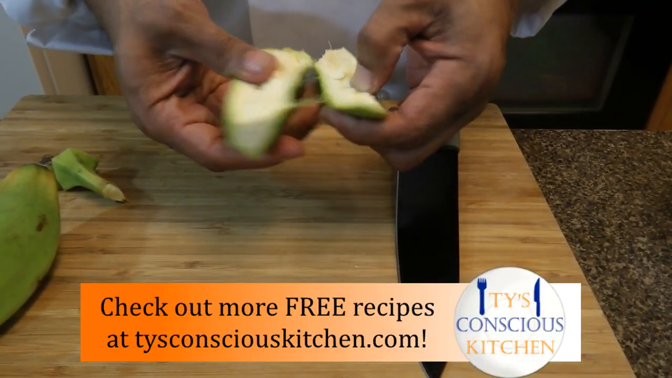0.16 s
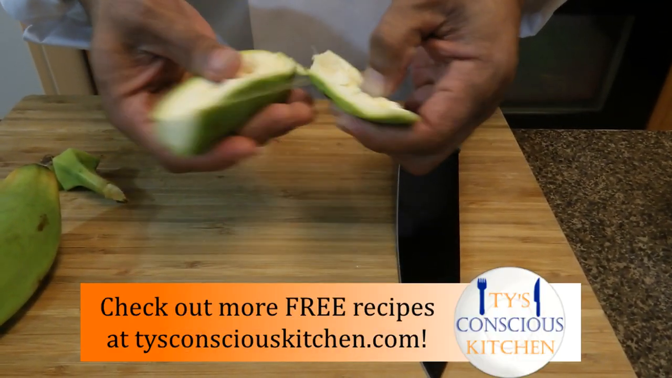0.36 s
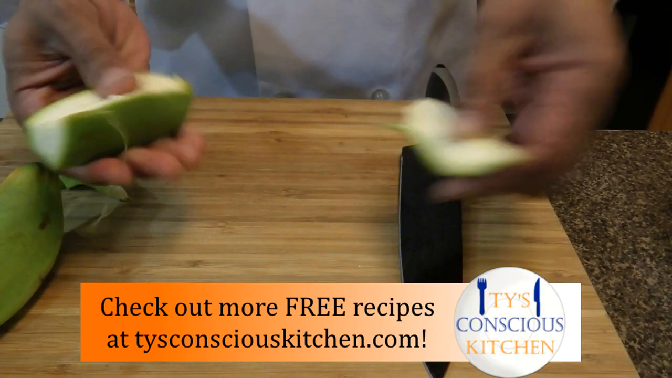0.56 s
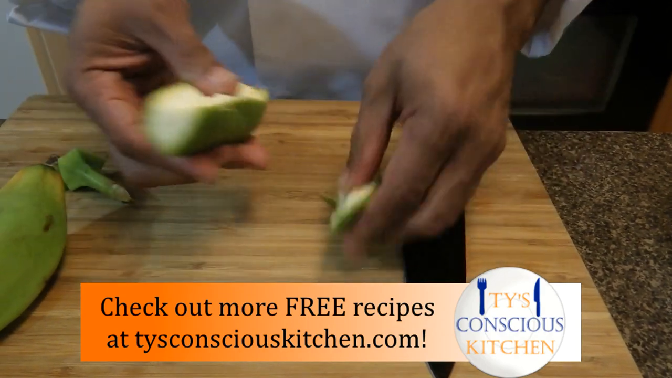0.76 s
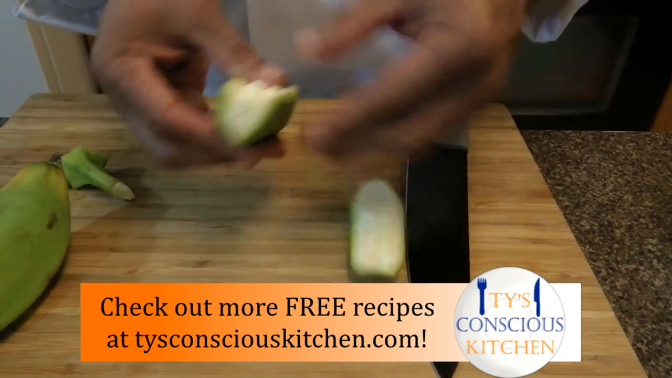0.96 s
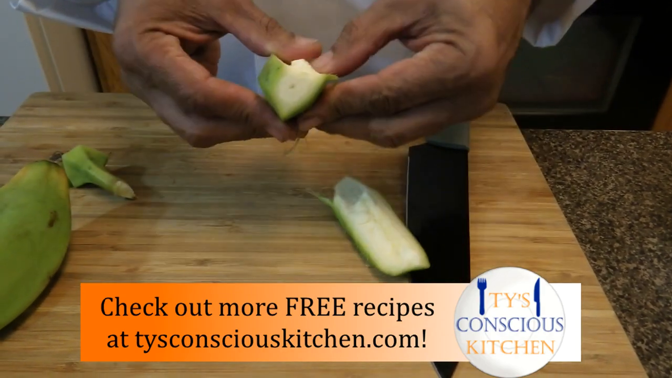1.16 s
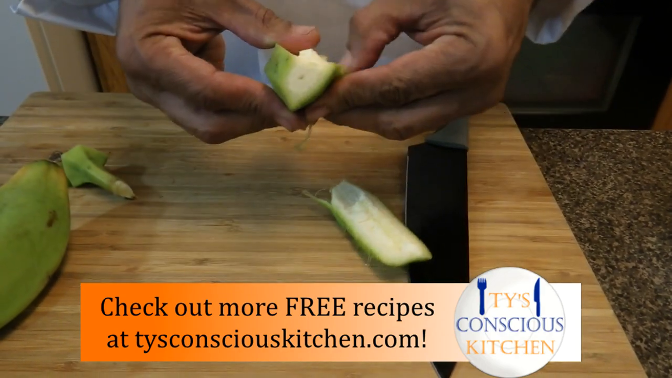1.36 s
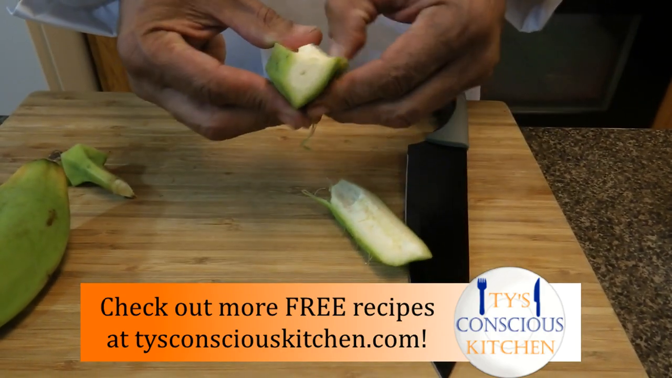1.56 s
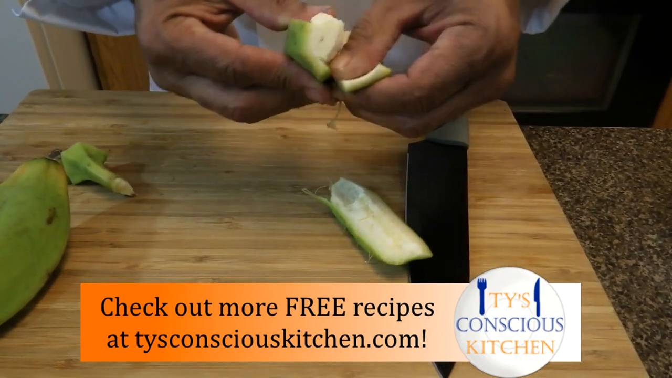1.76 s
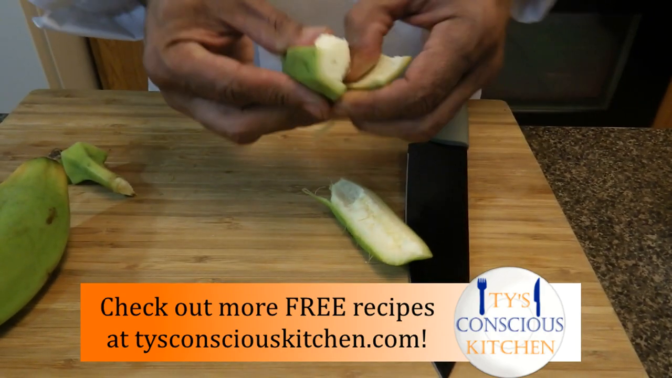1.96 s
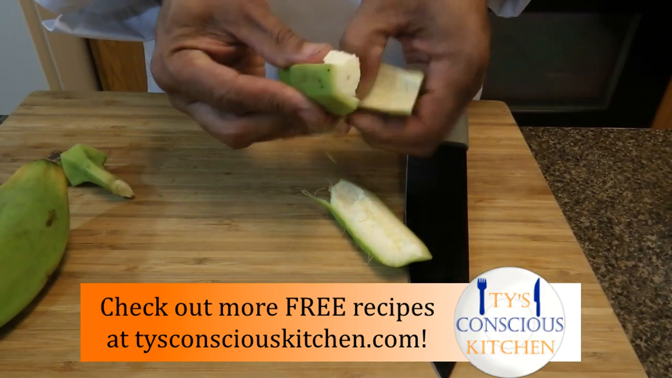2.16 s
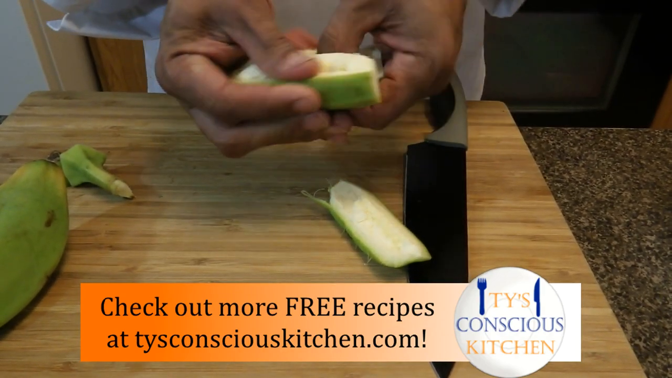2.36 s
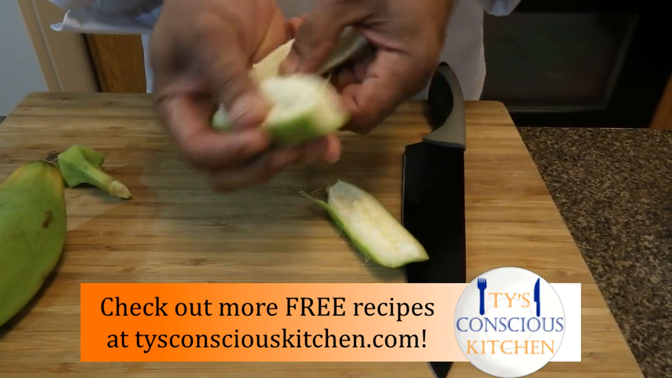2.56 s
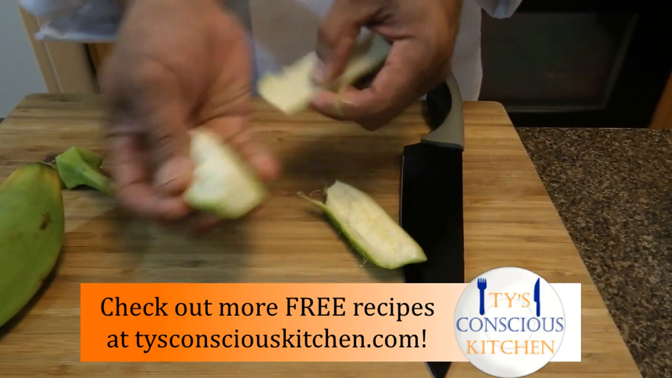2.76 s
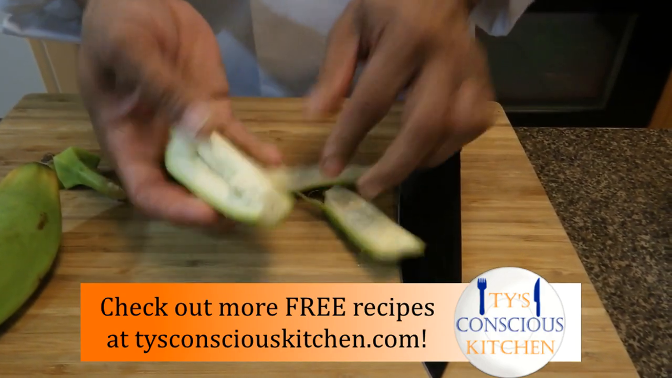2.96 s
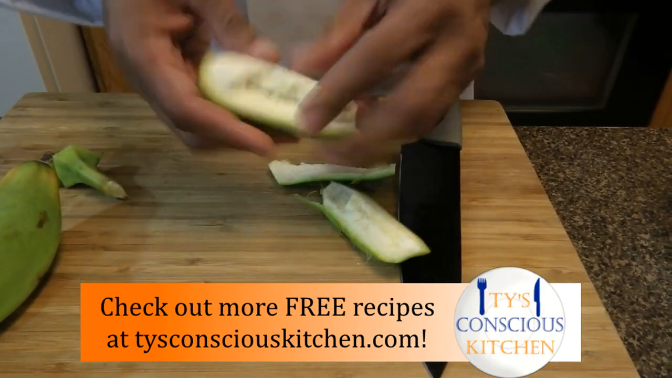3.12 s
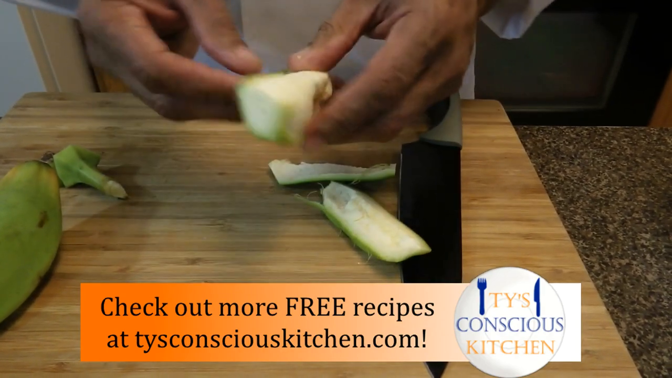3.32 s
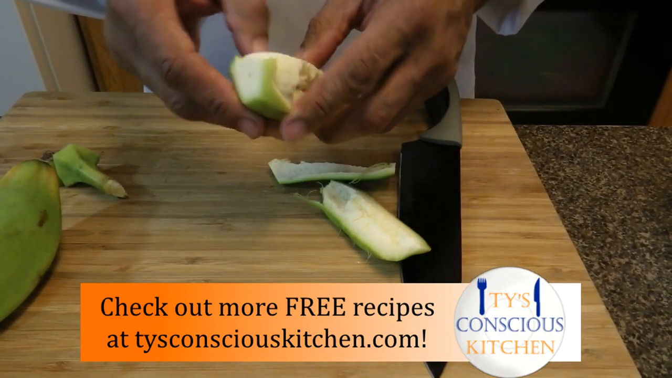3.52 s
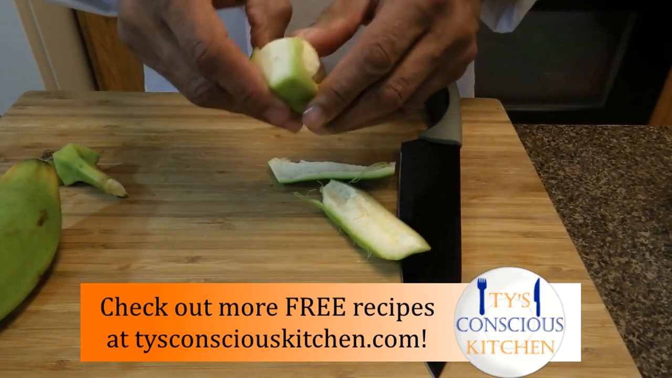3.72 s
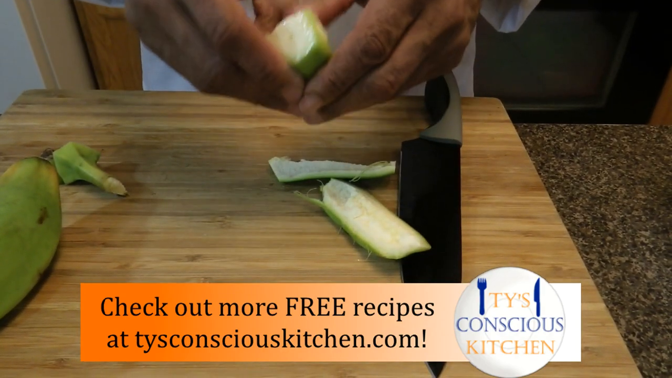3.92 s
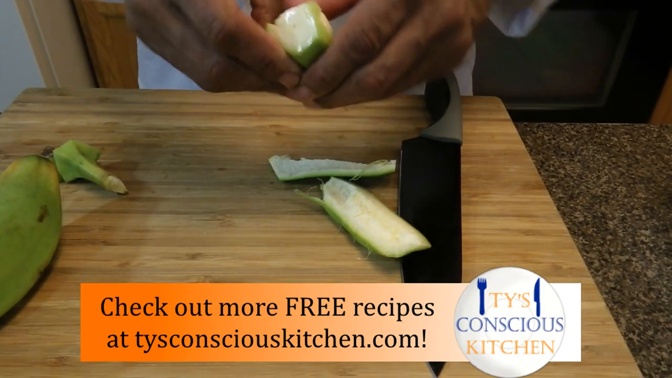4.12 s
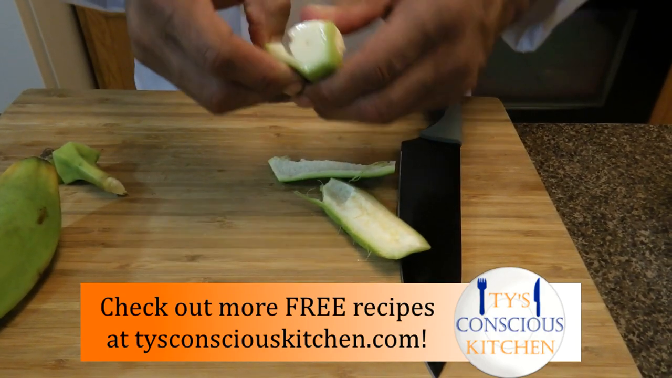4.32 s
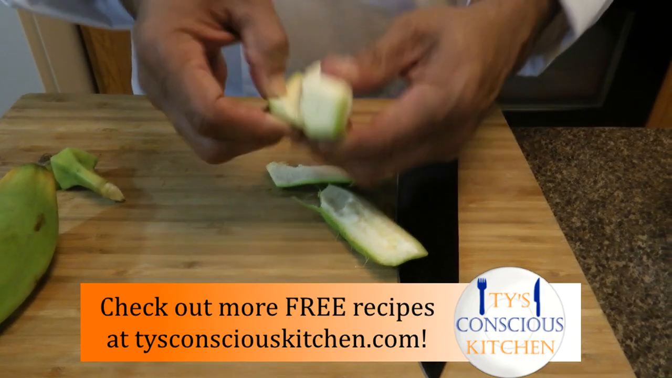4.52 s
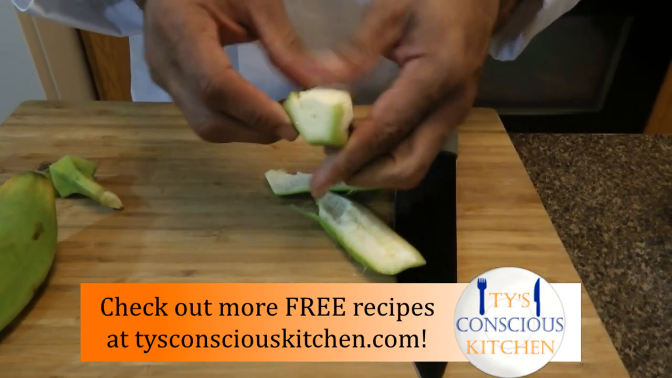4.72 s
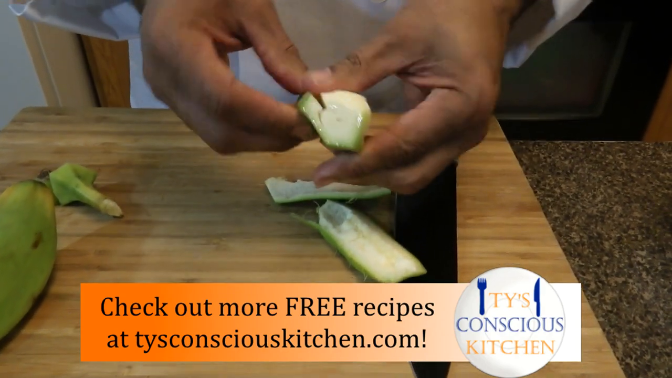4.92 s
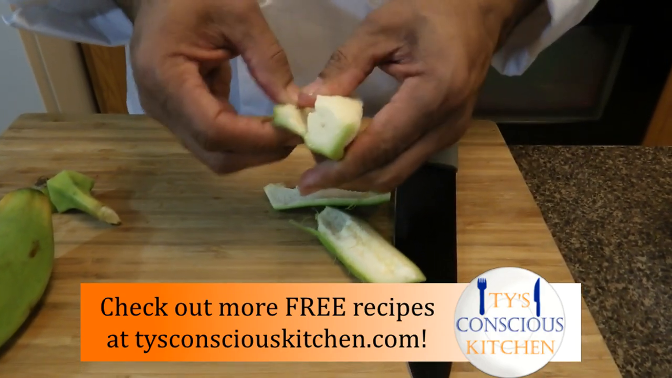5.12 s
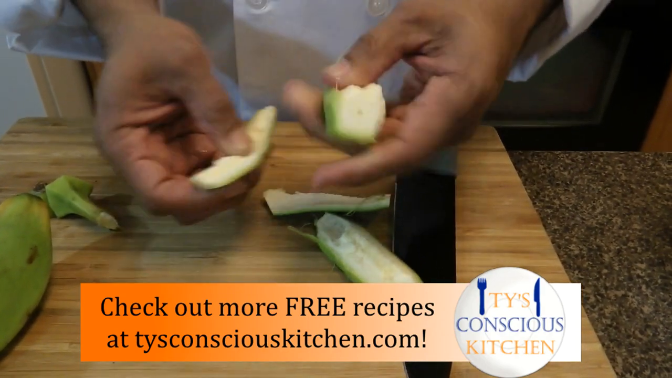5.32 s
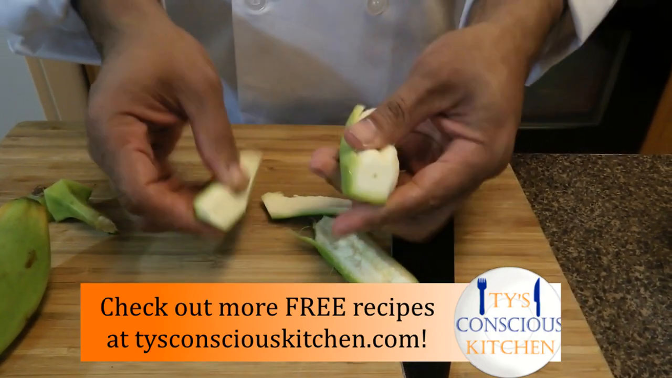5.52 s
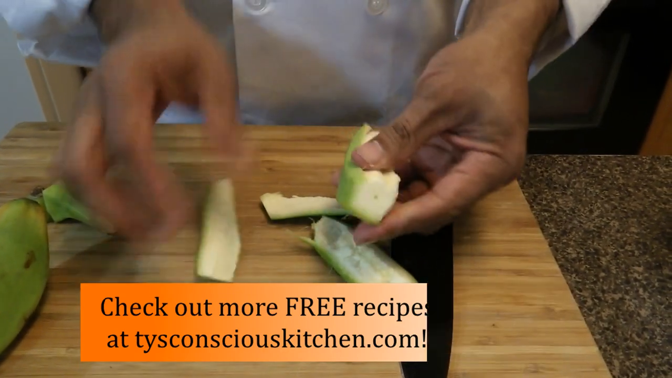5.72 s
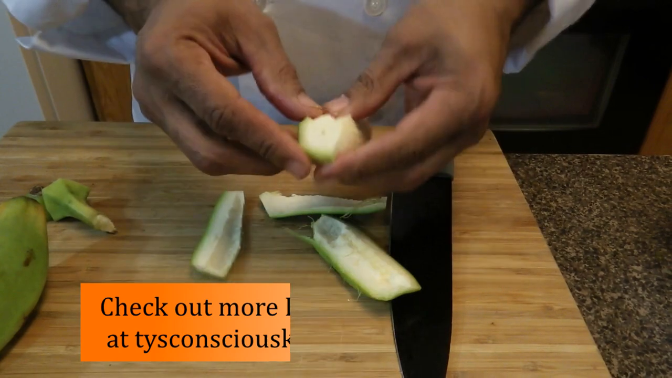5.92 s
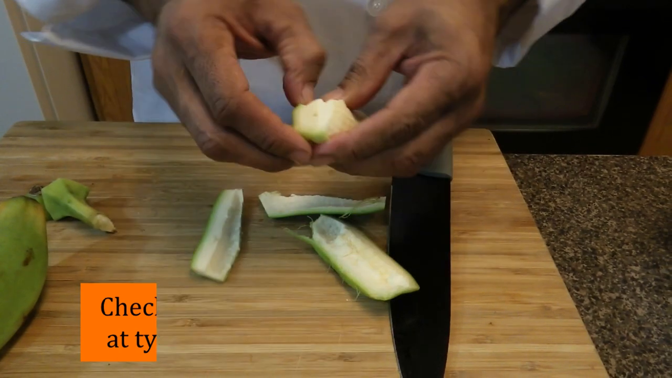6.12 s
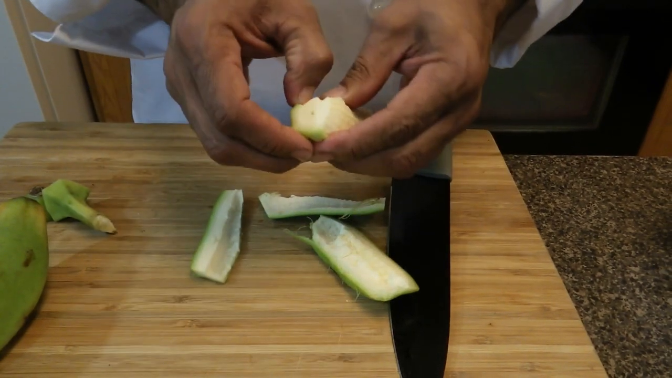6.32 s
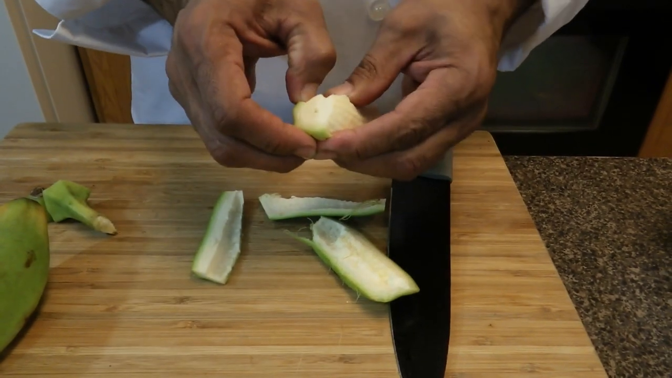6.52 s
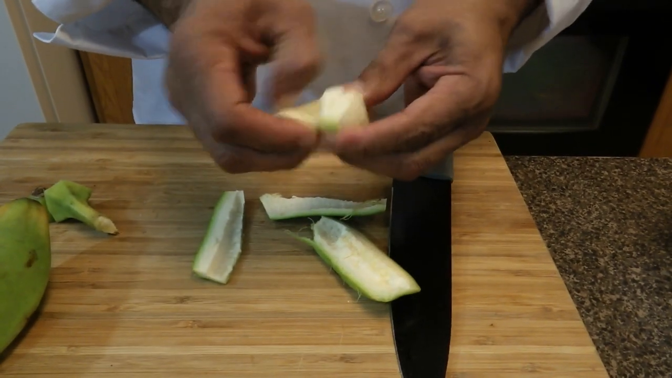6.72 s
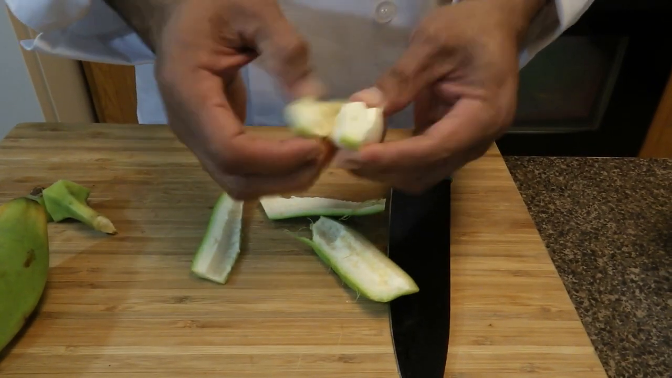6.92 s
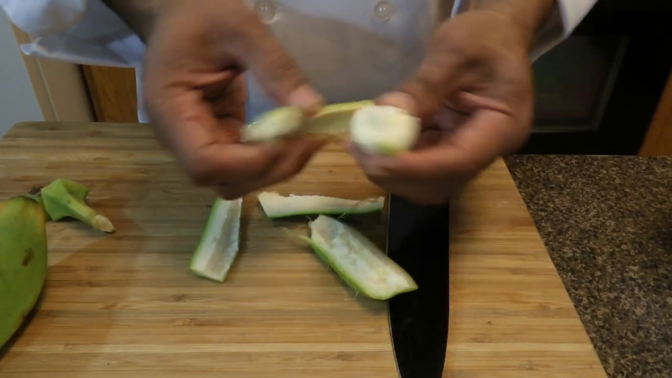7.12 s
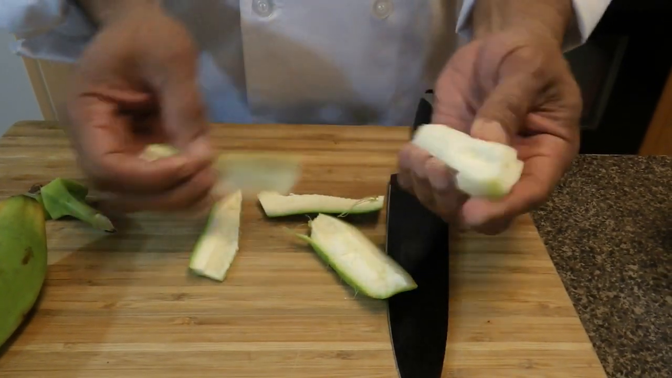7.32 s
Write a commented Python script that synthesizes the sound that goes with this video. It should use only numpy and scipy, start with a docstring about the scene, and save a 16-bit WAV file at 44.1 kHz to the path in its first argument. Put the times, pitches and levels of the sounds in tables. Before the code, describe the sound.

Hands strip a green banana with crackling rips and small snaps, setting peel on a wooden board in a softly humming kitchen.

```python
"""A green banana's thick peel tears off in short rips, by hand, over a wooden board in a kitchen.
Each rip is a run of breaking fibres that ring the strip; single stout fibres snap on their own.
Pieces of peel knock on the board, sleeves and fingers rustle, and an appliance hums behind it all.
Automatic gain control ducks the room after the loudest rips."""
import sys
import numpy as np
from scipy import signal
from scipy.fft import rfft, irfft, next_fast_len
from scipy.io import wavfile
from scipy.ndimage import uniform_filter1d

SR = 44100
rng = np.random.default_rng(int(sys.argv[2]) if len(sys.argv) > 2 else 0)


def generate_wav(signal):
    """Clip the signal to [-1, 1] and save it as 16-bit WAV at the path in sys.argv[1]."""
    frames = np.transpose(np.atleast_2d(signal))
    scaled = np.clip(frames, -1, 1) * 32767
    pcm = np.round(scaled).astype(np.int16)
    wavfile.write(sys.argv[1], SR, pcm)


N = 329684
TIME = np.arange(N) / SR


def peel_rips(fibres_per_s=3600, slips_per_s=150, slip_db=3, swell_db=4, fade_s=0.008, bends=5):
    """The tear front jerks forward and breaks fibres of all sizes; the strip's ring drifts as it bends."""
    # one rip a row: start/s, end/s, level/dB, growth over the rip/dB, strip ring/Hz, juicy top/dB
    rips = [(0.292, 0.304, -23.5, 2, 3000, -16), (0.32, 0.39, -33, -5, 2740, -0.5),
            (0.481, 0.533, -34.5, 4, 2900, 6.5), (0.531, 0.564, -28, -3, 2950, -1),
            (1.461, 1.533, -32, -6, 4400, 2), (1.756, 1.806, -23.5, 0.5, 6200, -4),
            (1.822, 1.878, -23.5, -0.5, 5700, -4.5), (2.041, 2.182, -35.5, -6.5, 3580, 0),
            (2.342, 2.492, -39, 2.5, 3700, 0), (2.585, 2.706, -27.5, 13, 5180, -1),
            (2.717, 2.778, -38.5, 9, 5900, 4), (2.806, 2.815, -21.5, -7, 3480, -5.5),
            (4.221, 4.35, -46.5, -8, 6440, -2), (4.372, 4.413, -27.5, 15, 6330, -1),
            (4.427, 4.469, -33, 6, 4700, 4), (4.501, 4.645, -35, 10.5, 3900, 3.5),
            (5.15, 5.326, -37.5, -18, 5350, 2.5), (5.314, 5.368, -20, -11.5, 3660, -1.5),
            (5.373, 5.382, -9.5, -10, 3550, 12), (5.377, 5.421, -30.5, 10.5, 3000, 2),
            (6.851, 6.88, -16, 3, 3830, 0.5), (6.878, 6.911, -20, 8, 6100, 11),
            (7.206, 7.374, -29, -3.5, 3480, 4.5)]
    out = np.zeros(N)
    slip = amp(slip_db * wander(slips_per_s))
    breaks = (rng.random(N) < fibres_per_s / SR) * rng.choice([-1, 1], N)
    stoutness = np.minimum(rng.exponential(1, N), 3.5)
    bend = np.clip(np.round((bends - 1) / 2 + wander(70)), 0, bends - 1)
    fizz = 0.32 * rng.standard_normal(N)  # tiny wet cells burst between the fibres
    for start, end, level_db, growth_db, strip_hz, top_db in rips:
        # a thick strip rings low and has more body; the fibres' higher ring follows it a little
        thickness = 3000 / strip_hz
        body_db = -3 + 11 * thickness ** 4.7
        fibre_hz = 6000 / thickness ** 0.29
        # a gentle pull picks off fibres one by one, a hard one tears them evenly
        spread_db = max(2.5 - 0.26 * (level_db + 27), 4)
        span = slice(round((start - .08) * SR), min(round((end + .08) * SR), N))
        t = TIME[span]
        progress = np.clip((t - start) / (end - start), 0, 1)
        fibres = breaks[span] * amp(spread_db * stoutness[span])
        drive = evened((fibres + fizz[span]) * slip[span])
        drive *= amp(swell_db * (np.sin(np.pi * progress) - 2 / np.pi))  # the pull swells midway
        rise_s = min(0.19 * (end - start), 0.0087)  # a slow pull takes longer to get going
        before, after = np.maximum(start - t, 0), np.maximum(t - end, 0)
        envelope = np.exp(-before / rise_s - after / fade_s)
        strain = amp(-20) * np.exp(-(before + after) / 0.018)  # a few fibres give on either side
        drive *= np.maximum(envelope, strain) * amp(level_db + growth_db * (progress - .5))
        for k, stretch in enumerate(1 + .07 * np.linspace(-1, 1, bends)):
            rings = [(strip_hz * stretch, 7.5), (fibre_hz * stretch, 7.8)]
            click = fibre_click(rings, width=0.044, body_db=body_db, top_db=top_db)
            crackle = signal.fftconvolve(drive * (bend[span] == k), click / np.linalg.norm(click))
            add(out, t[0], crackle)
            add(out, t[0] + rng.uniform(.0005, .0025), 0.21 * crackle)  # bounce off hands and board
    return out


def fibre_click(rings, width, body_db, top_db, size=1024):
    """One breaking fibre, coloured by the peel and by the strip's rings (f/Hz, boost/dB)."""
    # tone of the peel: f/Hz, level/dB
    peel_colour = [(100, -33), (500, -16), (1100, -12.5), (1800, -9.5), (2400, -7.5), (3200, -3.5),
                   (6800, -0.5), (9000, -1.5), (13000, -6.5), (15800, -15.5)]
    hz = abs(np.fft.fftfreq(size, 1 / SR))
    resonance = sum(db / (1 + ((hz / ring_hz - 1) / width) ** 2) for ring_hz, db in rings)
    body = body_db / (1 + (hz / 2700) ** 4)
    top = top_db * (1 - 1 / (1 + (hz / 9200) ** 8))
    gain = amp(curve_at(peel_colour, hz) + resonance + body + top)
    minimum_phase = np.exp(np.conj(signal.hilbert(np.log(gain))))  # keeps the attack sharp
    return np.fft.ifft(minimum_phase).real[:size // 2]


def fibre_snaps(lead_s=0.00098, splinter_s=0.0006, size=300):
    """A stout fibre starts to split, cracks and splinters; the finer it is, the higher and thinner."""
    # single fibres giving way: t/s, peak/dB, ring/Hz
    snaps = [(0.028, -15, 6760), (0.1104, -11.5, 4440), (0.211, -18, 6000), (0.215, -17, 6770),
             (.224, -14, 3600), (.255, -23, 4500), (0.2724, -19, 7600), (0.291, -6.5, 5900),
             (0.3006, -6, 3300), (0.5287, -9.5, 4970), (2.177, -26, 7500), (2.443, -18, 7000),
             (2.6796, -7, 6530), (2.707, -10, 7900), (2.999, -17, 5670), (4.3546, -19, 8000),
             (4.617, -14.5, 6950), (5.283, -15.5, 7000), (4.281, -24.5, 8400), (6.339, -28.5, 9000),
             (7.03, -25, 9600)]
    out, t = np.zeros(N), (np.arange(size) - size // 2) / SR
    for s, db, ring_hz in snaps:
        splinters = 0.64 * rng.standard_normal(size) * np.exp(np.minimum(t / lead_s, -t / splinter_s))
        click = fibre_click([(ring_hz, 10)], width=0.34, body_db=6.5, top_db=-4.5)
        crack = np.convolve((t == 0) + splinters, click)
        crack = signal.lfilter(*signal.butter(1, 0.1 * ring_hz, "high", fs=SR), crack)
        add(out, s + t[0], amp(db) * crack / abs(crack).max())
    return out


def board_knocks(split_hz=400, squash_s=0.0042, rumble_s=0.11, size=12000):
    """The weight of a piece drives the board's low modes, its damp edge slaps the high ones."""
    # peel and fingers meeting the board: t/s, dull thud/dB, sharp clack/dB
    knocks = [(0.803, -44, -32), (0.870, -27.5, -31), (1.030, -26, -25.5), (1.119, -22.5, -22.5),
              (1.210, -44, -32), (3.080, -47, -29.5), (3.115, -32, -23.5), (3.2, -42, -30),
              (5.868, -42, -14), (5.933, -47.5, -26.5)]
    # modes of the board with a knife lying on it: f/Hz, level/dB, t60/s
    board_modes = [(58.4, -15, 0.45), (142, -8.5, 0.072), (238, -4, 0.025), (465, -6.5, 0.075),
                   (776, 4.5, 0.023), (1336, -4.5, 0.019), (2090, -6, 0.0052), (2570, -10, 0.0055),
                   (3160, -6, 0.011)]
    out, t = np.zeros(N), np.arange(size) / SR
    hz, db, t60 = np.transpose(board_modes)[:, :, None]
    low_share = 1 / (1 + (hz / split_hz) ** 4)
    weight = (low_share * amp(db - 60 * t / t60) * np.sin(2 * np.pi * hz * t)).sum(0)
    counter_band = signal.butter(2, [60, 260], "band", fs=SR, output="sos")
    for s, thud_db, clack_db in knocks:
        # a dropped piece lands tip first and rings freely; one laid down is damped and settles after
        dropped = clack_db - thud_db > 20
        t60_scale, touch_s, touch_db = (1, -0.012, -8.5) if dropped else (0.86, 0.026, -10)
        decay = amp(db - 60 * t / (t60_scale * t60))
        ring = ((1 - low_share) * decay * np.cos(2 * np.pi * hz * t)).sum(0)
        squash = 0.43 * rng.standard_normal(size) * np.exp(-t / squash_s)
        slap = 4 * (squash + (t == 0))
        clack = signal.lfilter(*signal.butter(2, [380, 4000], "band", fs=SR), ring + slap)
        counter_rumble = evened(signal.sosfilt(counter_band, rng.standard_normal(size)))
        thud = weight / abs(weight).max() + 0.11 * counter_rumble * np.exp(-t / rumble_s)
        blow = amp(thud_db) * thud + amp(clack_db) * clack / abs(clack).max()
        add(out, s, blow)
        add(out, s + touch_s, amp(touch_db) * blow)
    # a small board radiates no deep bass
    return signal.sosfilt(signal.butter(4, 50, "high", fs=SR, output="sos"), out)


def hand_rustle(catches_per_s=180, catch_db=-9.5, spread_db=5, flutter_db=1, patchy_db=2):
    """Cloth and skin slide with a hiss of shifting colour; damp fingertips catch on the peel in ticks."""
    # tone of the rubbing: f/Hz, level/dB
    cloth_colour = [(100, -0.5), (750, -2), (1150, -1), (1750, 2), (4000, 0.5), (6700, 2.5), (8500, -1.5),
                    (15500, -18)]
    spectra = signal.stft(rng.standard_normal(N), nperseg=512)[2]
    patches = uniform_filter1d(rng.standard_normal(spectra.shape), size=6, axis=0)
    patches = evened(uniform_filter1d(patches, size=14, axis=1))
    hiss = signal.istft(spectra * amp(patchy_db * patches), nperseg=512)[1][:N]
    slide = shaped(hiss, cloth_colour) * amp(flutter_db * wander(25))
    catches = rng.random(N) < catches_per_s / SR
    ticks = catches * amp(spread_db * np.minimum(rng.exponential(1, N), 5))
    return hand_motion() * (slide + amp(catch_db) * shaped(ticks, cloth_colour))


def hand_motion(hold_db=-53.5, end_drop_db=6):
    """Envelope of the rustle: each stroke swells and dies away over the faint stir of holding."""
    # hands swinging apart or taking a new grip: fastest moment/s, length/s, level/dB
    strokes = [(0.356, 0.3, -45), (0.619, 0.12, -38.5), (0.927, 0.19, -43), (2.093, 0.26, -47.5),
               (2.56, 0.33, -43.5), (2.909, 0.17, -37.5), (3.172, 0.43, -42.5), (3.684, 0.19, -45),
               (3.79, 0.072, -45), (4.021, 0.13, -45), (4.802, 0.23, -43.5), (5, 0.13, -45.5),
               (5.42, 0.13, -44), (5.84, 0.3, -46.5), (6.006, 0.11, -37), (7.093, 0.21, -45),
               (7.444, 0.091, -35)]
    t = np.linspace(0, TIME[-1], 2000)
    swells = [amp(db - end_drop_db * abs(2 * (t - s) / length) ** 1.3) for s, length, db in strokes]
    power = amp(hold_db) ** 2 + sum(swell ** 2 for swell in swells)
    return np.interp(TIME, t, np.sqrt(power))


def kitchen(x, near_db=-14, near_s=0.0093, tail_db=-15, size=20000):
    """Adds early scatter from the counter and cupboards, and a short faint tail."""
    # decay of the room: f/Hz, t60/s
    room_decay = [(1500, 0.47), (6000, 0.33), (15000, 0.17)]
    t = np.arange(size) / SR
    near, far = rng.standard_normal((2, size)) * (rng.random((2, size)) < .1) * (t > .002)
    near = near * np.exp(-t / near_s)
    hz, frame_s, spectra = signal.stft(far, SR, nperseg=256)
    decay = amp(-60 * frame_s / curve_at(room_decay, hz)[:, None])
    tail = signal.istft(spectra * decay, SR, nperseg=256)[1][:size]
    echoes = amp(near_db) * near / np.linalg.norm(near) + amp(tail_db) * tail / np.linalg.norm(tail)
    return x + signal.fftconvolve(x, echoes)[:N]


def appliance(fan_db=-49.5, waver_rad=0.13):
    """A motor hums with a slight waver over a steady bed of fan noise."""
    # motor tones: f/Hz, rms level/dB
    motor_tones = [(59, -57.5), (119, -58), (293, -61), (344, -62)]
    # tone of the fan's air: f/Hz, level/dB
    fan_colour = [(25, -8), (60, -11.5), (84, -3.5), (110, -2), (210, 3), (350, -5.5), (540, -5.5),
                  (1000, -12), (2000, -22), (7200, -18.5), (15800, -26)]
    hum = np.zeros(N)
    for hz, db in motor_tones:
        phase = 2 * np.pi * (hz * TIME + rng.random()) + waver_rad * wander(1)
        hum += amp(db) * np.sqrt(2) * np.sin(phase)
    return hum + amp(fan_db) * shaped(rng.standard_normal(N), fan_colour)


def amp(db):
    """Decibels to gain."""
    return 10 ** (np.asarray(db) / 20)


def evened(x):
    """Scales to rms 1."""
    return x / np.sqrt(np.mean(x ** 2) + 1e-20)


def curve_at(points, hz):
    """Joins (f/Hz, value) points on a log-frequency axis."""
    f, value = np.transpose(points)
    return np.interp(np.log(hz + 1), np.log(f), value)


def add(mix, s, sound):
    """Mixes a sound in at s seconds."""
    part = mix[max(round(s * SR), 0):][:len(sound)]
    part += sound[:len(part)]


def wander(per_s):
    """Smooth random drift of rms 1 that changes about per_s times a second."""
    size = next_fast_len(N, True)
    hz = np.fft.rfftfreq(size, 1 / SR)
    return evened(irfft(rfft(rng.standard_normal(N), size) / (1 + (hz / per_s) ** 4), size)[:N])


def shaped(x, colour):
    """Equalises a long sound with a (f/Hz, level/dB) curve, to rms 1."""
    size = next_fast_len(N, True)
    gain = amp(curve_at(colour, np.fft.rfftfreq(size, 1 / SR)))
    return evened(irfft(rfft(x, size) * gain, size)[:N])


def scene():
    """The peeling in the kitchen, over the appliance, in mono."""
    peeling = peel_rips() + fibre_snaps() + board_knocks() + hand_rustle()
    return (kitchen(peeling) + appliance())[None]


def record(dry, threshold_db=-18, slope=0.62, cutoff_hz=15850):
    """Gain control ducks fast on loud rips and recovers slowly; then soft clipping and a low-pass."""
    power_db = 10 * np.log10(abs(uniform_filter1d(dry[0] ** 2, size=400)) + 1e-12)
    release_db = 10 * TIME  # the held peak level sinks steadily
    held_db = np.maximum.accumulate(power_db + release_db) - release_db
    over_db = np.maximum(held_db - threshold_db, 0)
    over_db = np.maximum(over_db, 6 - release_db)  # the gain starts low and comes up
    ducked = dry / amp(slope * uniform_filter1d(over_db, size=200))
    rounded = ducked / (1 + (ducked / .8) ** 4) ** .25
    low_pass = signal.firwin(401, cutoff_hz, window=("kaiser", 8), fs=SR)
    return signal.oaconvolve(rounded, low_pass[None], "same")


dry = scene()
out = record(dry)
generate_wav(out)
```